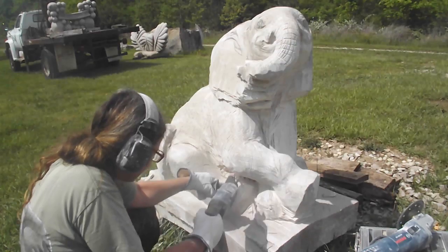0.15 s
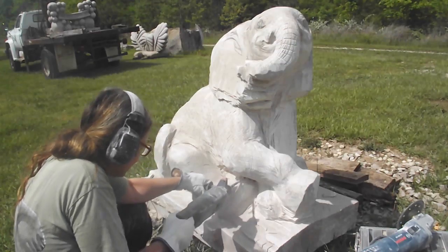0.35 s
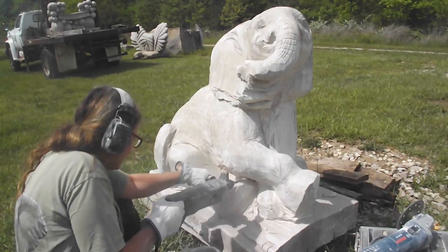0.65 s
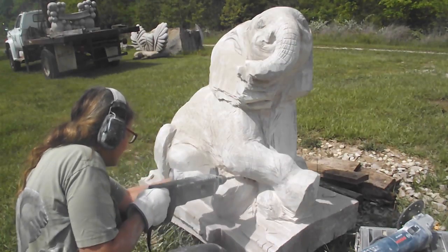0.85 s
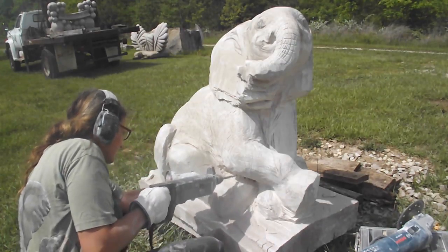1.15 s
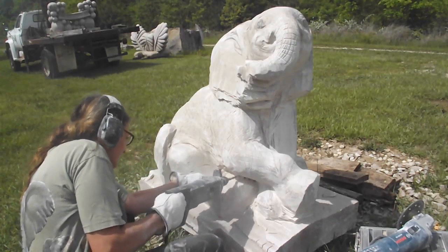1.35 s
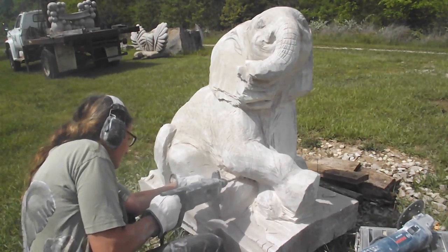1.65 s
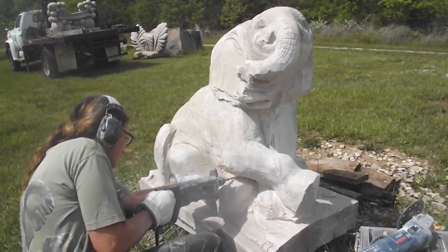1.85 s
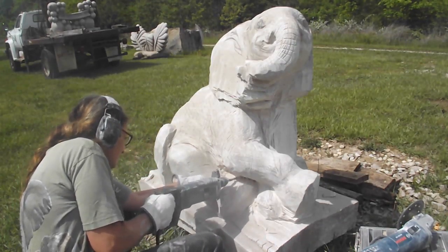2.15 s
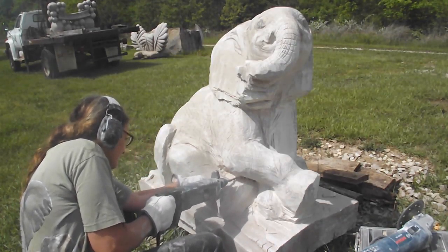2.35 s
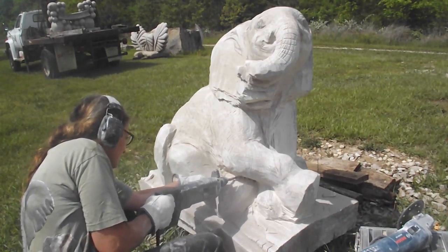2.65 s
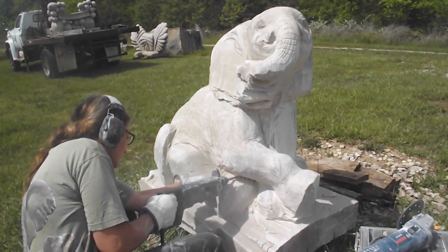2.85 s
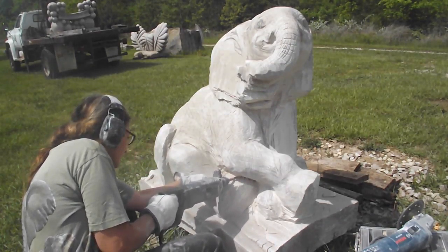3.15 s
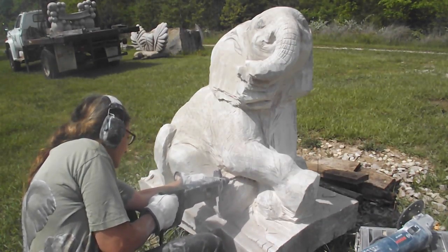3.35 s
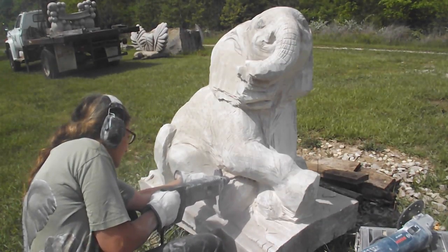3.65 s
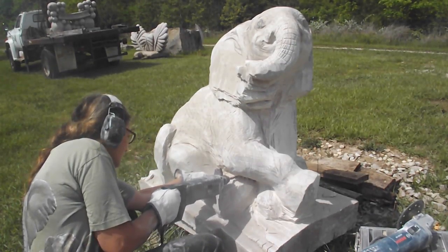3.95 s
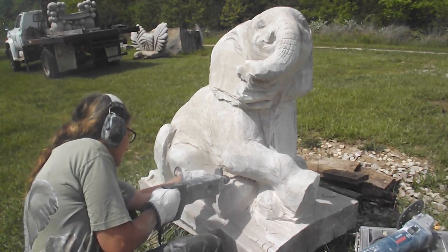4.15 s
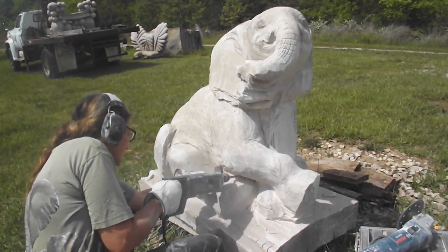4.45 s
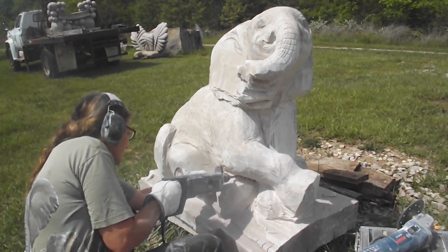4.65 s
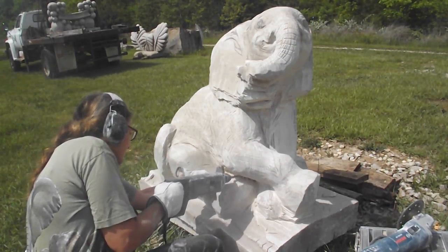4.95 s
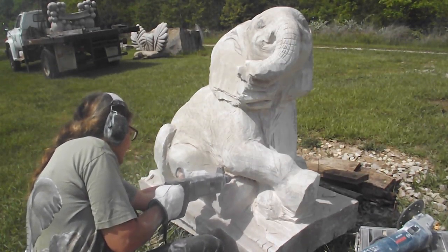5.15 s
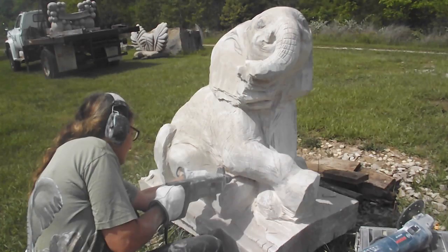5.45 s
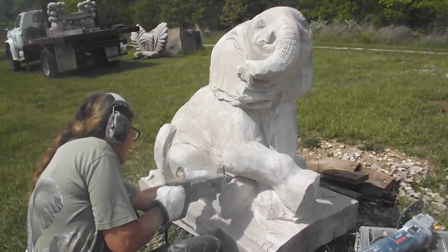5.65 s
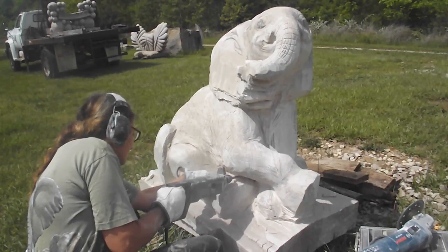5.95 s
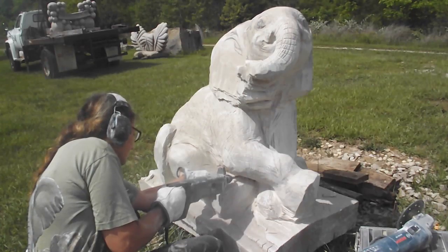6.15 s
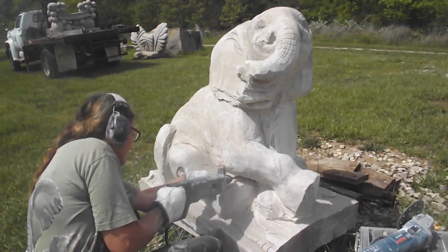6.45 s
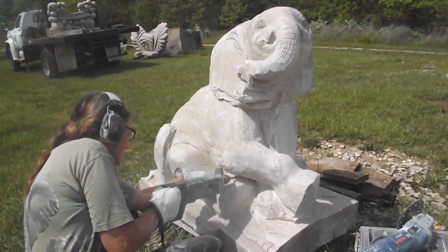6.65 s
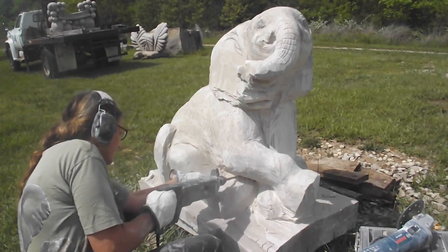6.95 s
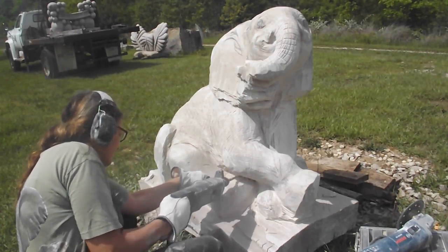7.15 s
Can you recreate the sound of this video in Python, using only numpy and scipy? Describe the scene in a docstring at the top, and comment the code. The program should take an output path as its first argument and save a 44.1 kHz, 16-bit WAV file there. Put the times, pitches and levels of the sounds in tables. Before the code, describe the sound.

A hammer drill held against stone is running down from the start, its whine falling while the piston knocks loosely and irregularly until about 1.2 seconds. In the short pause, birds whistle and one trills farther off, a few small handling ticks sound, and low gusts of wind buffet the microphone over the faint hiss of an open field. At about 1.9 seconds the motor restarts with a knock and a rising squeal, then settles into a loud gear whine with fast, rattling hammer blows. Single harder blows crack out around 2.2, 4.4 and 5.6 seconds. From about 4.8 seconds the drill is pressed harder into the stone: its pitch drops, the hammering grows firmer and the bit rings brightly. At about 6.6 seconds the pressure eases and the motor speeds up again, running on until the end at about 7.3 seconds.

```python
"""A rotary hammer drill held against a stone block in a field runs down, its piston knocking loosely.
In the pause: birds, small handling ticks, wind buffeting the microphone.
The motor restarts with a squeal. The crank gear whines and rattles; the piston strikes once a turn.
Pressed harder into the stone, the drill slows and the bit rings; released, it speeds up again."""
import sys
import numpy as np
from scipy import signal
from scipy.fft import rfft, irfft
from scipy.io import wavfile
from scipy.ndimage import uniform_filter1d

SR = 44100
rng = np.random.default_rng(int(sys.argv[2]) if len(sys.argv) > 2 else 0)


def log_audio(samples):
    """Write samples as a 16-bit WAV file to the path given in sys.argv[1]."""
    # one column per channel
    frames = np.atleast_2d(samples).T
    # limit to full scale, then quantise
    limited = np.clip(frames, -1, 1)
    pcm = np.round(limited * 32767).astype(np.int16)
    wavfile.write(sys.argv[1], SR, pcm)


N = 322371


def gain_of(db):
    return 10 ** (np.asarray(db) / 20)


def unit_rms(x):
    return x / np.sqrt(np.mean(x ** 2) + 1e-20)


def add(mix, start_s, sound):
    part = mix[round(start_s * SR):][:len(sound)]
    part += sound[:len(part)]


def columns_at(t, rows):
    time_s, *columns = np.transpose(rows)
    return [np.interp(t, time_s, column) for column in columns]


def unroll(rows):
    t = np.arange(rows[0][0], rows[-1][0], 1 / SR)
    return t, columns_at(t, rows)


def drift(size, smooth_s):
    """Smoothed noise, rms 1."""
    width = max(int(smooth_s * SR), 1)
    return unit_rms(uniform_filter1d(uniform_filter1d(rng.standard_normal(size), width), width))


def coloured(x, spectrum, modes=()):
    """Minimum-phase filter. spectrum: freq_hz, gain_db; modes: centre_hz, width_hz, boost_db."""
    hz = np.fft.rfftfreq(4096, 1 / SR)
    freq_hz, gain_db = np.transpose(spectrum)
    db = np.interp(np.log(hz + 1), np.log(freq_hz + 1), gain_db)
    db += sum(boost / (1 + (2 * (hz - centre) / width) ** 2) for centre, width, boost in modes)
    log_gain = np.log(np.maximum(gain_of(db), 1e-5))
    mirrored = np.r_[log_gain, log_gain[-2:0:-1]]
    impulse = np.fft.ifft(np.exp(mirrored - 1j * signal.hilbert(mirrored).imag)).real
    return signal.oaconvolve(x, impulse)[:len(x)]


def resonate(x, hz, width_hz):
    """Unity-gain resonance; hz may glide."""
    carrier = np.exp(2j * np.pi * np.cumsum(hz * np.ones(len(x))) / SR)
    pole = np.exp(-np.pi * width_hz / SR)
    return 2 * (carrier * signal.lfilter([1 - pole], [1, -pole], x / carrier)).real


def narrow_band(x, hz, width_hz):
    return unit_rms(resonate(resonate(x, hz, width_hz), hz, width_hz))


def whistle(hz, width_hz):
    """Noise in a narrow moving resonance."""
    return narrow_band(rng.standard_normal(len(hz)), hz, width_hz) * signal.windows.tukey(len(hz), .15)


def hits(rows, spectrum, modes=()):
    """Short noise bursts through a resonant body."""
    out = np.zeros(N)
    t = np.arange(-.02, .06, 1 / SR)
    for time_s, peak_db, decay_s in rows:
        envelope = np.exp(-abs(t) / np.where(t > 0, decay_s, .33 * decay_s))
        burst = coloured(rng.standard_normal(len(t)) * envelope, spectrum, modes)
        add(out, time_s + t[0], gain_of(peak_db) * burst / abs(burst).max())
    return out


# Outdoor noise spectrum: freq_hz, relative_db
FIELD_SPECTRUM = [(150, -22), (400, -19), (830, -23), (1150, -17.5), (1330, -11.5), (1550, -19),
                  (2190, -20), (2800, -15), (3110, -2.5), (3450, -7), (4300, -19), (5000, -29.5),
                  (7000, -37.5), (15000, -53)]


def field(level_db=-38):
    """Steady hiss of the open field."""
    return gain_of(level_db) * unit_rms(coloured(rng.standard_normal(N), FIELD_SPECTRUM))


# Wind strength: time_s, rumble_db, flutter_db
WIND_LEVELS = [(0.0, -40, -56), (0.02, -33.5, -48.5), (0.83, -31, -46), (1.26, -14.5, -39),
               (1.38, -26.5, -36), (1.87, -15.5, -36), (1.97, -38.5, -53), (2.69, -32, -46),
               (3.64, -42.5, -65), (3.83, -31, -47), (4.09, -36, -53), (4.17, -20, -27), (4.21, -28, -41),
               (4.58, -30.5, -38), (4.66, -42, -65), (4.8, -32.5, -38), (5.23, -48, -57.5),
               (5.37, -30, -41.5), (5.7, -45, -55), (5.78, -40, -40), (6.49, -42, -54), (6.7, -35, -38),
               (6.92, -43, -53), (7.31, -38, -42)]


def wind():
    """Low buffeting on the microphone; the same gusts shake rumble and flutter."""
    rumble_db, flutter_db = columns_at(np.arange(N) / SR, WIND_LEVELS)
    rumble = coloured(rng.standard_normal(N), [(3, -16), (14, 5), (30, -3.5), (55, -22.5), (120, -76.5)])
    flutter = coloured(rng.standard_normal(N),
                       [(35, -28.5), (55, 2.5), (100, -10), (170, -20.5), (400, -61.5)])
    gusts = drift(N, .05)
    rumble *= gain_of(1.4 * gusts)
    flutter *= gain_of(3.1 * drift(N, .024) + 2 * gusts)
    return gain_of(rumble_db) * unit_rms(rumble) + gain_of(flutter_db) * unit_rms(flutter)


# Bird whistles, one list a note: time_s, pitch_hz, level_db
BIRD_NOTES = [
    [(1.23, 3520, -43), (1.27, 3870, -33), (1.33, 3950, -32), (1.40, 4000, -32)],
    [(1.28, 4230, -42), (1.34, 4220, -34), (1.41, 4170, -44)],
    [(1.2, 3300, -38), (1.26, 3205, -38), (1.345, 3120, -34), (1.37, 3130, -30.5), (1.45, 3084, -44),
     (1.6, 3040, -40)],
    [(1.46, 2020, -52), (1.52, 2300, -52), (1.6, 2580, -43), (1.67, 3090, -35), (1.72, 3240, -34.5),
     (1.79, 3146, -30), (1.87, 2970, -32), (1.91, 3020, -49)],
]


def birds(trill_start_s=1.454, chirp_gap_s=.0702, scatter_rt60_s=.5):
    """Whistles and a farther trill of falling chirps, scattered by trees."""
    near, far = np.zeros(N), np.zeros(N)
    for note in BIRD_NOTES:
        t, (pitch_hz, level_db) = unroll(note)
        add(near, t[0], gain_of(level_db) * whistle(pitch_hz, width_hz=90))
    chirp_hz = np.linspace(5900, 3600, 1800)
    chirp = np.sin(2 * np.pi * np.cumsum(chirp_hz) / SR) * signal.windows.tukey(len(chirp_hz), .3)
    for k in range(7):
        chirp_db = -45 - 3 * ((k - 2) / 4) ** 2
        add(far, trill_start_s + k * chirp_gap_s, gain_of(chirp_db) * chirp)
    lag_s = np.arange(SR // 2) / SR
    trees = rng.standard_normal(len(lag_s)) * gain_of(-60 * lag_s / scatter_rt60_s)
    scatter = signal.fftconvolve(gain_of(-.5) * near + gain_of(4) * far, trees / np.linalg.norm(trees))
    return near + far + scatter[:N]


# Handling ticks: time_s, peak_db, decay_s
HANDLING_TICKS = [(1.241, -21.5, 0.0029), (1.4007, -21, 0.002), (1.53, -20, 0.002), (1.6, -23, 0.002),
                  (1.6394, -24, 0.0018), (1.82, -24, 0.0025)]


def handling_ticks():
    """Small ticks as the drill is handled in the pause."""
    return hits(HANDLING_TICKS, [(300, -16), (2000, -6), (3000, 6), (6000, -16), (9000, -27), (14000, -35)])


def squeal(start_s=1.93, end_s=2.4, from_hz=890, to_hz=3930, glide_s=.068):
    """A squeal climbs and settles during spin-up."""
    rise_s, fade_from_s, fade_db_per_s = .033, .16, 26
    t = np.arange(start_s, end_s, 1 / SR) - start_s
    pitch_hz = to_hz - (to_hz - from_hz) * np.exp(-t / glide_s)
    attack = np.minimum(t / rise_s, 1) ** 2
    level_db = -18 - fade_db_per_s * np.maximum(t - fade_from_s, 0)
    return start_s, attack * gain_of(level_db) * whistle(pitch_hz, width_hz=190)


# Housing and microphone response: freq_hz, gain_db
HOUSING_SPECTRUM = [(110, -59), (200, -40), (400, -32.5), (600, -21.5), (1000, -17), (1800, -14),
                    (2500, -8.5), (3150, 3.5), (4200, -11), (5000, -16), (5600, -22.5), (7900, -29.5),
                    (8600, -38.5), (10500, -39), (12000, -46.5), (15700, -49)]
# Housing resonances: centre_hz, width_hz, boost_db
HOUSING_MODES = [(728.7, 34, 11.5), (1123, 72, 3.5), (1367, 82, 3), (2120, 42, 1.5), (3350, 100, 0),
                 (3887, 230, 4), (4843, 260, 6), (6130, 290, 3.5), (9620, 1600, 6)]


def housing(x):
    """The housing colours the noise of the works; rms 1."""
    return unit_rms(coloured(x, HOUSING_SPECTRUM, HOUSING_MODES))


# Loose blows: time_s, peak_db, decay_s
PISTON_KNOCKS = [(.395, -7, 0.0073), (.447, -9, 0.0066), (.527, -11, .012), (.566, -7, 0.0077),
                 (.601, -7.5, 0.01), (.632, -5.5, .01), (.678, -8.5, 0.009), (.718, -8, 0.0088),
                 (.77, -6, 0.021), (.822, -5.5, 0.0086), (.882, -6.5, 0.012), (.935, -9, 0.02),
                 (.975, -7, 0.01), (.989, -8, 0.0036), (1.003, -9, 0.0018), (1.014, -9, 0.004),
                 (1.078, -10, 0.0064), (1.153, -10, 0.0012), (1.93, -3, 0.026)]


def piston_knocks():
    """Slow loose blows as the piston runs out, and one at the restart."""
    return hits(PISTON_KNOCKS, HOUSING_SPECTRUM, HOUSING_MODES + [(430, 610, 16.8), (1041, 43, 15)])


# Hard blows: time_s, peak_db, decay_s
HARD_BLOWS = [(1.95, -4, 0.0033), (2.056, -6, 0.0016), (2.217, 1, 0.0026), (4.3675, 1.5, 0.0016),
              (5.143, -9, 0.0042), (5.578, 0.5, 0.0026), (5.59, -12, 0.00067), (5.907, -16, 0.0019),
              (6.602, -11, .003)]


def hard_blows():
    """Single blows land much harder than the rest and crack brightly."""
    return hits(HARD_BLOWS, HOUSING_SPECTRUM, HOUSING_MODES + [(9100, 12000, 2.7)])


# Drill level dips: start_s, depth_db
LEVEL_DIPS = [(2.27, -1), (2.63, 3.5), (3.06, 3), (3.13, 2), (3.26, 0.5), (3.33, 0), (3.41, -0.5),
              (3.78, 5), (3.87, 3.5), (4.05, 4), (4.23, 2), (4.44, 1.5), (5.11, 2.5), (5.35, 1.5),
              (5.59, 5.5), (5.91, 7.5), (6.11, 4.5), (6.25, 6.5), (6.42, 5)]


def dips_db(t, fall_s=.004, recover_s=.071):
    """The level dips quickly and recovers slowly, amid small random surges."""
    start_s, depth_db = np.transpose(LEVEL_DIPS)[:, :, None]
    since_s = np.maximum(t - start_s, 0)
    drop_db = depth_db * np.minimum(since_s / fall_s, 1) * np.exp(-since_s / recover_s)
    return drift(len(t), .026) - drop_db.sum(0)


# Bit resonances at full bite: centre_hz, width_hz, relative_db
BIT_MODES = [(7680, 500, -19), (13000, 900, -27.5), (15700, 250, -37)]


def bit_ring(blows, bite):
    """The struck bit rings when it bites hard."""
    struck = blows * rng.standard_normal(len(blows))
    return bite ** 4 * sum(gain_of(db) * narrow_band(struck, hz, width) for hz, width, db in BIT_MODES)


# Blow-rate harmonics: multiple, relative_db
THUMP_HARMONICS = [(3, -50), (4, -45.5), (5, -42), (6, -45.5), (8, -46), (9, -37), (11, -34.5), (12, -35.5),
                   (22, -29.5)]


def thump(turns, bite, waver_db=1.8):
    """Low wavering harmonics of the blows, growing with bite."""
    return 2.84 * bite * sum(gain_of(db + waver_db * drift(len(turns), .033))
                             * np.sin(2 * np.pi * (k * turns + rng.random()))
                             for k, db in THUMP_HARMONICS)


def piston_blows(turns, since_blow_s, bite, jitter_s=.00048, rise_s=.0018, decay_s=.003):
    """Envelope of one blow a crank turn; bite steadies the strength."""
    index = turns.astype(int)
    strength, lateness = rng.standard_normal((index[-1] + 1, 2))[index].T
    t = since_blow_s - jitter_s * lateness
    strength_db = (3.3 - 1.3 * bite) * np.clip(strength, -2, 2)
    return unit_rms(gain_of(strength_db) * np.exp(-abs(t) / np.where(t > 0, decay_s, rise_s)))


def clatter(mesh_cycles, since_blow_s, blows, bite):
    """Loose teeth rattle between blows; a bit pressed home is struck the same way every turn."""
    size = len(blows)
    rattle_db = .86 * drift(size, .0045) + .71 * drift(size, .012) + 1.9 * np.cos(2 * np.pi * mesh_cycles)
    envelope = unit_rms(gain_of(rattle_db)) + (.24 + .29 * bite) * blows
    repeated = rng.standard_normal(SR)[(since_blow_s * SR).astype(int)]
    repeated *= unit_rms(np.exp(-abs(since_blow_s) / .002))
    return unit_rms(envelope * rng.standard_normal(size)) + .85 * bite * repeated


def gear_whine(mesh_hz, mesh_cycles, turns, multiples, tones_db, waver_db=2.8):
    """Teeth press harder once a turn, more unevenly when slow; gear play blurs the first tone."""
    size = len(turns)
    load_db = 1.97 * (2300 / mesh_hz) ** .74 * np.cos(2 * np.pi * turns)
    tones = sum(gain_of(db + load_db + waver_db * drift(size, .015))
                * np.sin(2 * np.pi * k * mesh_cycles + .55 * drift(size, .0033))
                for k, db in zip(multiples, tones_db))
    blur = unit_rms(resonate(rng.standard_normal(size), mesh_hz, width_hz=140))
    return tones + gain_of(tones_db[0] - 11) * blur


def drill(mesh_hz, level_db, bite, multiples, tones_db, teeth=26, hum_cycles_per_turn=6):
    """Blows, rattle, whine and shaft hum all follow one motor speed."""
    mesh_cycles = np.cumsum(mesh_hz) / SR
    turns = mesh_cycles / teeth
    since_blow_s = (turns % 1 - .5) * teeth / mesh_hz
    blows = piston_blows(turns, since_blow_s, bite)
    noise = clatter(mesh_cycles, since_blow_s, blows, bite)
    roar = housing(noise + gear_whine(mesh_hz, mesh_cycles, turns, multiples, tones_db))
    ring = bit_ring(blows, bite)
    bursts = blows ** 2.1 * rng.standard_normal(len(blows))
    grit = gain_of(-32) * unit_rms(coloured(bursts, [(3000, -18), (6000, 4), (11000, -28), (15700, -20)]))
    hum = gain_of(-31.5) * np.sin(2 * np.pi * hum_cycles_per_turn * turns) * (mesh_hz / 2300) ** 4
    return gain_of(level_db) * (roar + ring + thump(turns, bite) + hum + grit)


# Run-down level: time_s, level_db
COAST_LEVELS = [(0, -13.5), (.14, -18), (.4, -16), (.55, -20), (.7, -19.5), (1.0, -20), (1.08, -23),
                (1.24, -37.5)]
# Mesh harmonics 1-7: loudest_hz, relative_db
COAST_HARMONICS = [(960, -12.5), (1930, -5), (2000, -6), (1930, -5.5), (1900, -6.5), (2200, -10),
                   (2380, -11)]


def drill_coasting(from_hz=1893, friction_hz=519, floor_hz=230, decay_s=.91, bite=.1):
    """Off: friction slows the motor; each harmonic peaks at a gear case resonance."""
    above_db_per_oct, below_db_per_oct = 8, 17
    t, (level_db,) = unroll(COAST_LEVELS)
    mesh_hz = np.maximum((from_hz + friction_hz) * np.exp(-t / decay_s) - friction_hz, floor_hz)
    loudest_hz, peak_db = np.transpose(COAST_HARMONICS)[:, :, None]
    multiples = np.arange(len(COAST_HARMONICS)) + 1
    octaves = np.log2(np.outer(multiples, mesh_hz) / loudest_hz)
    tones_db = peak_db - abs(octaves) * np.where(octaves > 0, above_db_per_oct, below_db_per_oct)
    return t[0], drill(mesh_hz, level_db + dips_db(t), bite, multiples, tones_db)


# Speed the load allows (free, pressed in, released): time_s, mesh_hz
LOAD_SPEEDS = [(1.915, 2280), (2.4, 2272), (2.74, 2260), (2.82, 2170), (2.92, 2235), (3.5, 2290),
               (4.05, 2265), (4.17, 2310), (4.3, 2238), (4.6, 2250), (4.74, 2300), (4.84, 2250),
               (4.95, 1960), (5.5, 1962), (6.4, 1990), (6.57, 2030), (6.67, 2320), (7.31, 2348)]
# Level under power: time_s, level_db
DRIVEN_LEVELS = [(1.92, -35), (1.93, -18), (1.96, -13), (2.02, -14), (2.8, -13), (4.3, -13), (4.72, -15.5),
                 (4.84, -13.5), (5.0, -16), (6.55, -14.5), (6.85, -16), (7.31, -16)]
# Bite and relative tone levels before the housing: time_s, bite_0_to_1, mesh1_db, mesh2_db, fan_db
BITE_AND_TONES = [(1.92, .11, -29, -21, -25), (2.08, 0.26, -11, -26, -17), (2.8, 0.3, -11, -18.5, -12),
                  (4.78, 0.27, -13, -6.5, -18), (4.84, 0.77, -10, -7, -20), (5.1, .71, -17, -27.5, -22),
                  (6.58, 0.8, -17, -27, -13), (6.63, 0.39, -17, -21, -18), (6.78, 0.52, -9.5, -10, -8),
                  (6.95, 0.27, -23, -28, -17), (7.31, 0.81, -14, -13, -4)]


def drill_driven(from_hz=638.2, motor_lag_s=.14, fan_multiple=3.5):
    """On: motor speed lags what the load allows; the fan blades add a tone."""
    t, (allowed_hz,) = unroll(LOAD_SPEEDS)
    pole = np.exp(-1 / (motor_lag_s * SR))
    mesh_hz = signal.lfilter([1 - pole], [1, -pole], allowed_hz, zi=[from_hz])[0]
    level_db, = columns_at(t, DRIVEN_LEVELS)
    bite, *tones_db = columns_at(t, BITE_AND_TONES)
    return t[0], drill(mesh_hz, level_db + dips_db(t), bite, [1, 2, fan_multiple], tones_db)


def stereo_spread(air, left_lag_s=2.1e-5, centred_below_hz=1300):
    """Treble slightly later on the left, bass centred; a faint treble haze differs left and right."""
    taps = rng.standard_normal(2000) * np.exp(-np.arange(2000) / 400)
    haze = .25 * np.diff(signal.oaconvolve(air, taps / np.linalg.norm(taps))[:N + 2], 2)
    hz = np.fft.rfftfreq(N, 1 / SR)
    half_lag = np.exp(-1j * np.pi * hz * left_lag_s / (1 + (centred_below_hz / (hz + 1)) ** 2))
    left, right = (irfft(rfft(air) * shift, N) for shift in (half_lag, half_lag.conj()))
    return np.array([left + haze, right - haze])


def scene():
    """Field and drill in stereo, with the same wind in both channels."""
    air = birds() + field() + piston_knocks() + handling_ticks() + hard_blows()
    for source in (squeal, drill_coasting, drill_driven):
        add(air, *source())
    return stereo_spread(air) + wind()


def record(dry):
    """Soft overload near full scale, then the band limit."""
    knee, headroom, cutoff_hz = .7, .3, 15800
    over = np.maximum(abs(dry) - knee, 0)
    soft = dry - np.sign(dry) * (over - headroom * np.tanh(over / headroom))
    lowpass = signal.firwin(511, cutoff_hz, window=("kaiser", 9), fs=SR)
    return signal.oaconvolve(soft, lowpass[None], "same")


dry = scene()
out = record(dry)
log_audio(out)
```